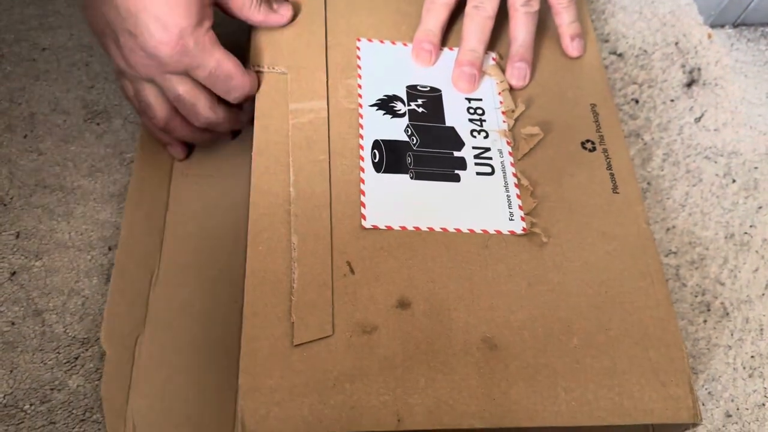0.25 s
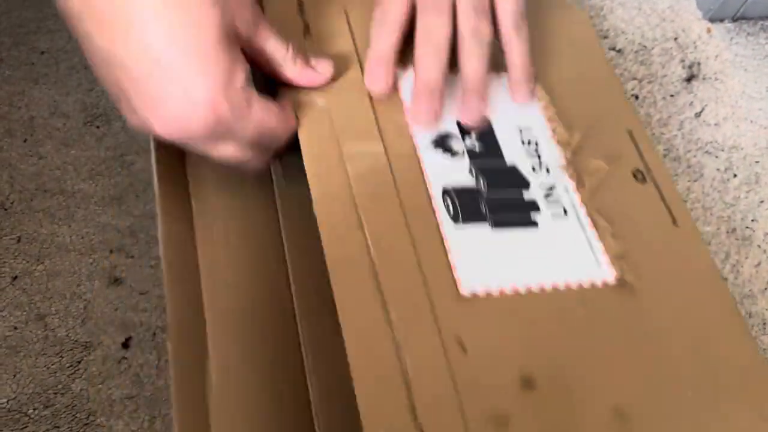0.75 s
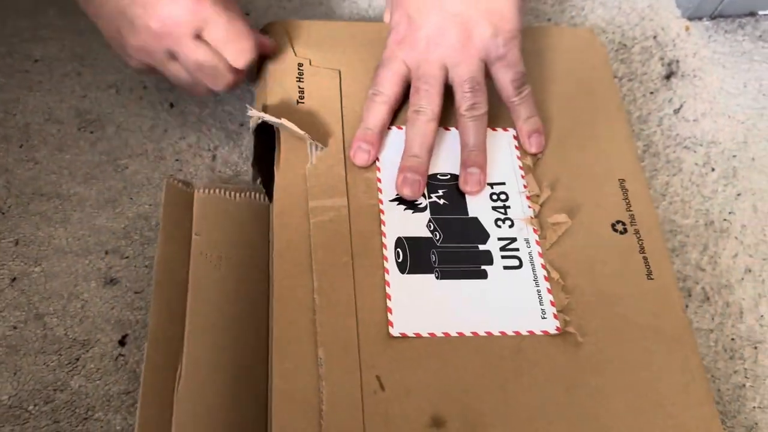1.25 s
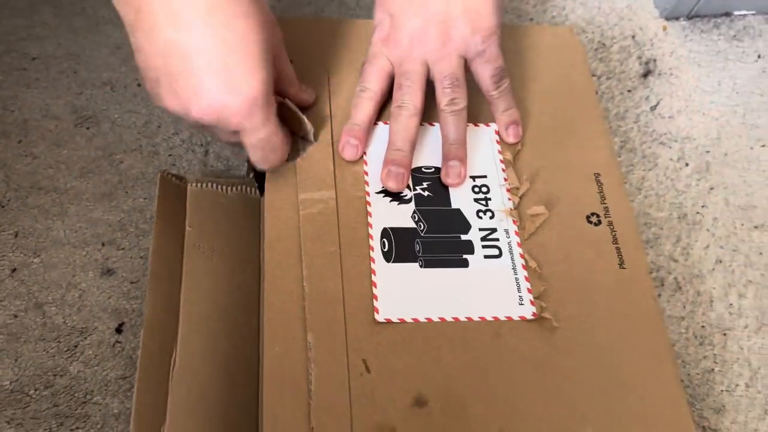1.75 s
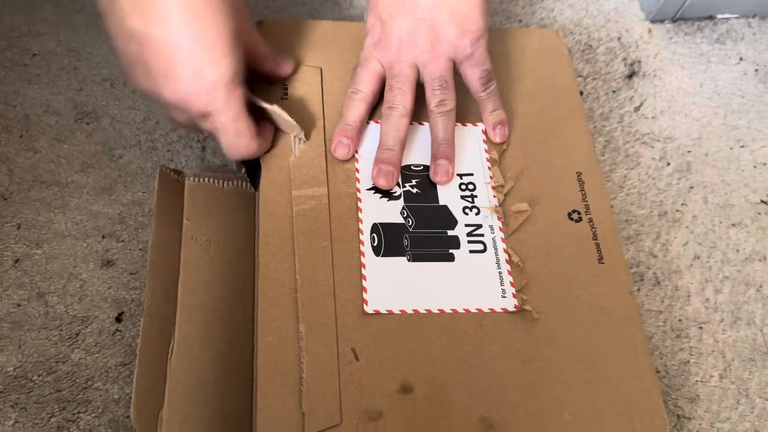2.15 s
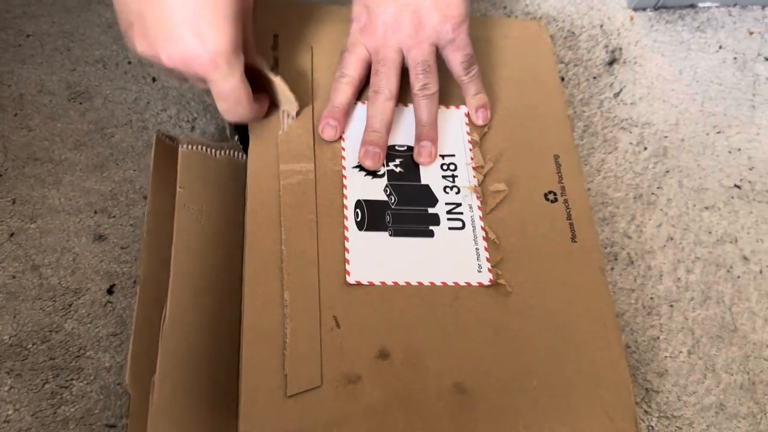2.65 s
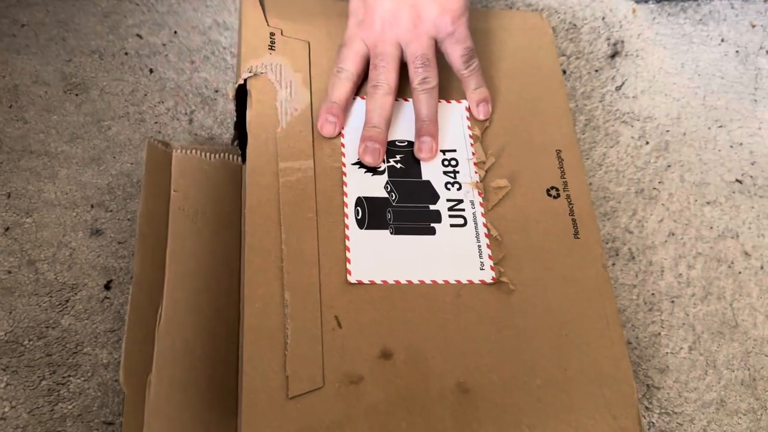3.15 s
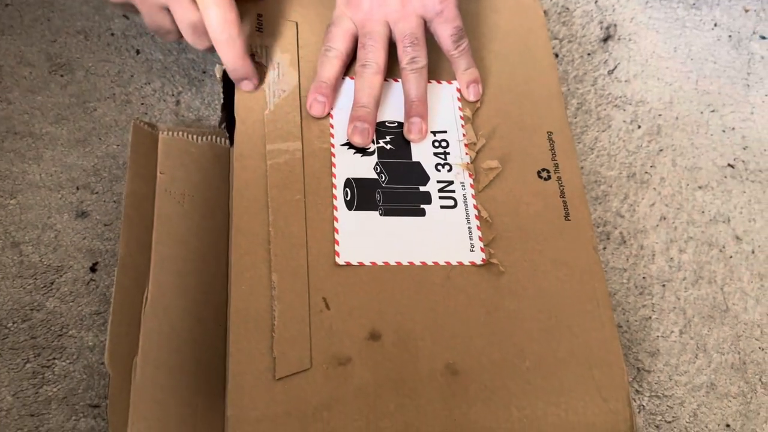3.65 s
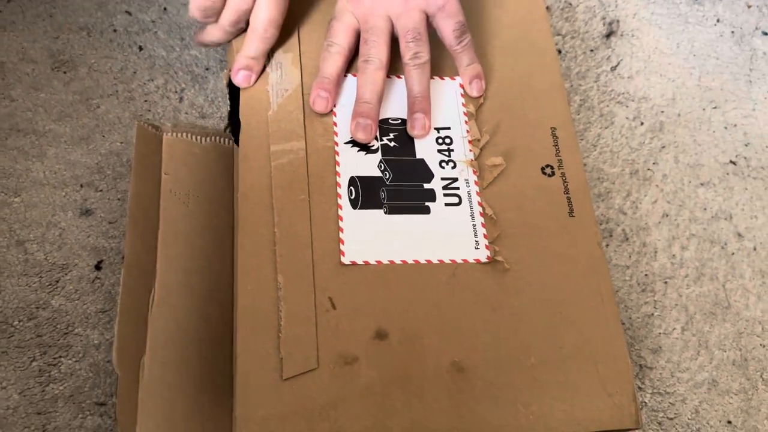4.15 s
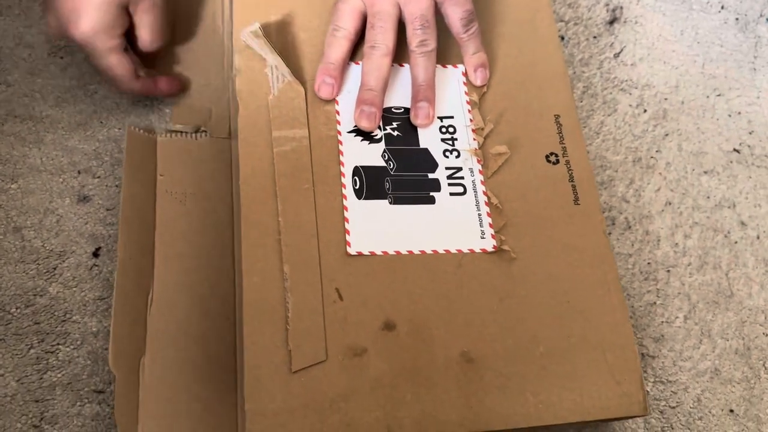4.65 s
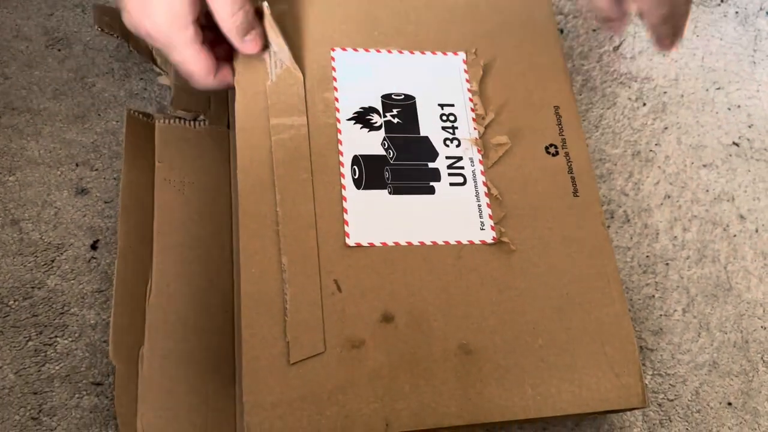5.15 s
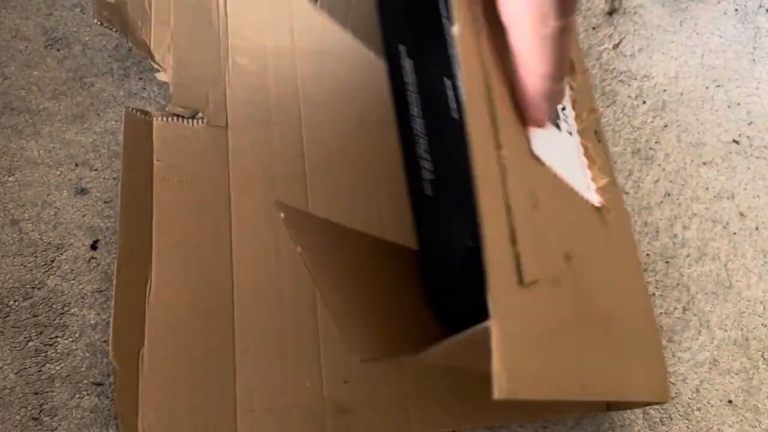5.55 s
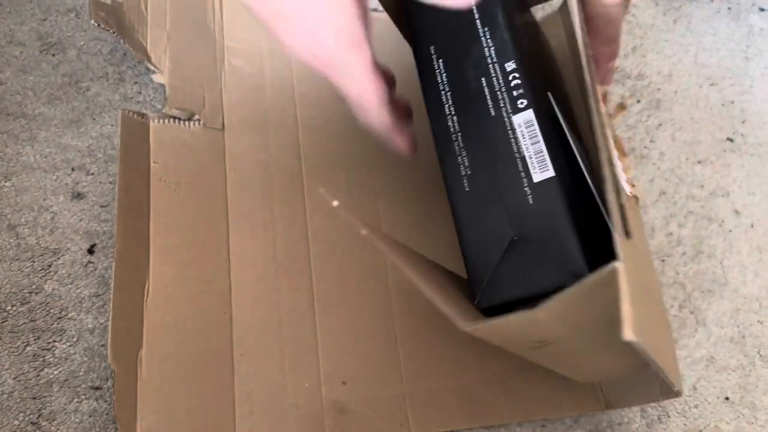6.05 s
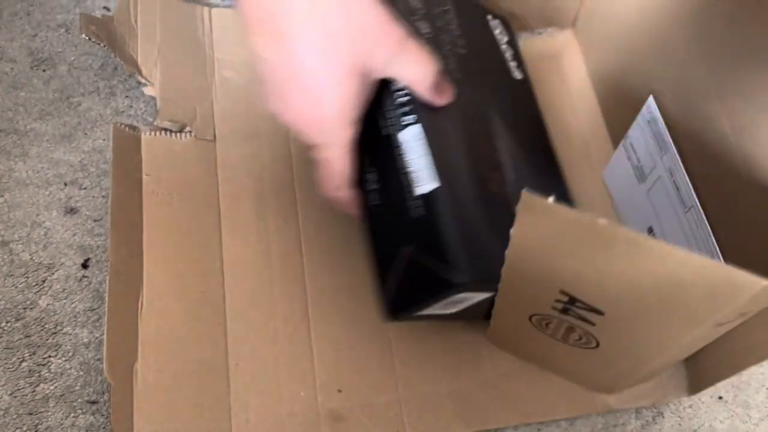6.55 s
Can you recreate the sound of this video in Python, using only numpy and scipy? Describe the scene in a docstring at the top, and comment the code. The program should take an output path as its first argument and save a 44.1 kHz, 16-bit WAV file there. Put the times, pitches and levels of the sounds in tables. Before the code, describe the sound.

Close stereo, indoors, short diffuse tail and faint low rumble. At 0-0.15 s a fast run of perforations pops sharply over fading scrape; fibres crack at 0.3 and 0.5 with a flap knock. Soft thumps and scraping at 0.6-0.85, then a strong crackling snap and knock at 1.1, trailing hiss. From 1.4 to 1.7 a faint fingertip groan and rubs; then mostly quiet rustling and tiny taps, a knock at 2.65. At 2.95-3.07 the strip rips off in a dense burst, ending in a snap. Near quiet, a dull knock at 3.5, swelling scrapes from 3.8, small tears and knocks at 4.1-4.3, a strong knock at 4.58, a softer one at 4.86. Light handling until scraping and heavy flap thuds at 5.6, 5.8 and 5.96, with brief bright edge scrapes. Rubbing from 6.3, a big thud at 6.55, then a hollow carton judders and catches at 6.63-6.8, pitch sagging slightly.

```python
"""Hands work a corrugated cardboard box open on a concrete floor, close to the microphones, indoors.
Board scrapes and hisses as grainy noise; fibres, perforations and flaps snap as short dispersive shocks.
The tear strip rips off in a dense run of breaks, and the panels thump and sway in their low modes.
At the end a smaller carton judders out, stick-slip bursts ringing its hollow walls.
A short diffuse room tail and a faint low rumble lie behind it all, in stereo."""
import sys
import numpy as np
from scipy import signal
from scipy.fft import rfft, irfft, next_fast_len
from scipy.io import wavfile
from scipy.ndimage import uniform_filter1d, map_coordinates

SR = 44100
rng = np.random.default_rng(int(sys.argv[2]) if len(sys.argv) > 2 else 0)


def dump_mix(stems):
    """Bounce the given channels to the path in sys.argv[1] as a 16-bit WAV at rate SR."""
    frames = np.atleast_2d(stems).T  # one column per channel
    limited = np.clip(frames, -1, 1)  # hard clip at full scale
    pcm = np.round(limited * 32767).astype(np.int16)
    wavfile.write(sys.argv[1], SR, pcm)


N = 300321
TIME = np.arange(N) / SR  # s

# Levels are relative to the other sounds of their kind unless stated.
# Strokes over the board, and at 3.22 s a faint swish: [start t/s, end t/s, scrape level/dB,
# hiss against scrape level/dB, swell from start to end level/dB]
STROKES = [(0, 0.15, -43.5, 3, -24.5), (0.58, 0.85, -40, 2.5, 3.5), (0.99, 1.085, -38, 0, 13),
           (1.085, 1.28, -44, 5.5, -28.5), (1.596, 1.68, -42.5, 5, -12), (1.715, 1.84, -40.5, 0, -3.5),
           (2.258, 2.36, -49.5, -17, -9), (2.71, 2.80, -48.5, 6, 30), (3.224, 3.29, -77, 19.5, 21),
           (3.635, 3.785, -48.5, 0.5, -1.5), (3.845, 4.035, -40.5, -7, 19), (4.084, 4.24, -38.5, 0, -6),
           (4.356, 4.47, -41.5, -7, -15.5), (4.53, 4.587, -31.5, 2.5, 20), (4.848, 4.893, -32.5, -0.5, -2),
           (5.245, 5.5, -43.5, 0.5, 10), (5.495, 5.63, -32, 0.5, -1), (5.63, 5.68, -34, -9, 0),
           (6.294, 6.62, -35, -2, -3.5), (6.381, 6.43, -39, 16.5, -1)]
# Hands staying on the box, rustling faintly: [start t/s, end t/s, level/dB]
HANDLING = [(0.152, 0.483, -44), (0.53, 1.317, -46), (1.6, 2.09, -53.5), (2.139, 2.93, -49.5),
            (3.487, 3.6, -49), (4.372, 5.058, -46.5), (5.133, 6.333, -58.5), (5.703, 5.977, -43.5)]
# Single fibres cracking: [t/s, level/dB]
CRACKS = [(0.047, -17), (0.3345, -15.5), (0.4995, -11.5), (1.0825, -4.5), (1.2168, -17), (1.338, -31),
          (1.5988, -19.5), (2.3701, -20), (3.882, -26.5), (4.226, -19.5), (4.443, -19.5), (4.461, -20.5),
          (4.514, -28), (5.314, -20.5), (5.3305, -22), (5.939, -20)]
# Runs of perforations giving way one after another: [first t/s, last t/s, perforations/count,
# level/dB, change over the run level/dB, strip pitch f/Hz]
PERFORATION_RUNS = [(0.063, 0.1034, 5, -3, 3, 840), (0.138, 0.147, 2, -1, 2.5, 900),
                    (1.087, 1.142, 4, -10.5, 14.5, 1000), (4.251, 4.3, 3, -6, -4, 1300)]
# Soft blows on the panels: [t/s, level/dB, pitch f/Hz]
THUMPS = [(0.365, -29, 263), (0.401, -31.5, 297), (0.743, -24, 200), (0.765, -17.5, 240),
          (0.852, -20.5, 93.5), (1.218, -22, 218), (2.553, -27, 400), (2.804, -30, 238),
          (3.037, -14.5, 537), (4.259, -31, 150), (4.359, -33.5, 200), (6.383, -27, 136)]
# A flap strikes the box and sets a panel swaying: [t/s, level/dB, sway against knock level/dB,
# sway pitch f/Hz]
KNOCKS = [(0.499, -5, -25.5, 169), (0.718, -11.5, -22.5, 200), (1.142, -4, -18, 80), (2.658, -15, -48, 250),
          (3.49, -19.5, -28, 300), (3.827, -26.5, -13, 253), (4.084, -15, -21, 230),
          (4.146, -9.5, -25, 180), (4.575, -3, -26.5, 100), (4.864, -17, -5.5, 260),
          (5.587, -2.5, -17, 171), (5.824, 2.5, -15, 121), (5.96, -1, -25.5, 134), (6.556, 3.5, -24.5, 165)]
# Short mid-range knocks: fingertips tapping and catching on the flaps, and the strip snapping free
# at 3.04 s: [t/s, level/dB]
MID_KNOCKS = [(0.847, -18), (2.443, -31), (2.515, -24), (2.543, -24), (3.041, -5.5), (3.839, -20.5),
              (5.219, -30), (6.547, -12)]
# A fingertip dragging twice on the lid: [t/s, level/dB]
FINGERTIP_DRAG = [(1.385, -42), (1.53, -44), (1.595, -79), (1.605, -33.5), (1.66, -45), (1.68, -44)]
# The strip tearing off in one pull: [t/s, fibre level/dB, panel level/dB]
RIP = [(2.945, -46.5, -46.5), (2.97, -25.5, -62.5), (3.002, -18, -24.5), (3.053, -17.5, -15.5),
       (3.068, -36, -44.5), (3.15, -90.5, -64.5)]
# The lid's edge scraping brightly along the glossy carton: [t/s, level/dB]
LID_EDGE = [(5.71, -57), (5.805, -43), (5.818, -20), (5.835, -59.5), (5.907, -28), (5.92, -76.5),
            (5.99, -26)]
# The inner carton being pulled out: [t/s, level/dB]
CARTON_PULL = [(6.629, -17.5), (6.7, -18.5), (6.795, -19.5), (6.812, -27.5)]
# The carton's edge catching hard: [t/s, level/dB]
CARTON_CATCHES = [(6.666, -11), (6.693, -15.5), (6.72, -10.5), (6.729, -13.5)]

# Tone of each contact, as relative density per hertz: [f/Hz, level/dB]
SCRAPE_TONE = [(45, -5), (250, -2.5), (370, -5), (1000, 1), (1500, -4.5), (2900, -10.5), (8000, -36)]
HISS_TONE = [(900, -15.5), (2200, -6), (5600, -1), (11500, -4.5), (15500, -5)]
FIBRE_TONE = [(400, -11.5), (1000, 5.5), (3600, -3), (15500, -7)]
PANEL_TONE = [(60, -22), (450, 2), (950, 4), (3000, -27.5)]
FINGERTIP_TONE = [(80, -22.5), (480, 6), (740, 3), (1000, -11.5), (3000, -31.5)]
# Resonances of the box, heard in every contact: [f/Hz, width f/Hz, level/dB]
BOX_MODES = [(260, 60, -4.5), (486, 76, 0.5), (890, 69, -7.5), (5370, 360, -5)]
# Resonances of the inner carton's walls: [f/Hz, width f/Hz, level/dB]
CARTON_MODES = [(170, 220, -16.5), (515, 170, -9.5), (1102, 180, -2), (1540, 470, -7), (2070, 204, -0.5),
                (2500, 160, -6), (3820, 380, -8), (9100, 2700, -23)]
# Stereo width, side against mid: [f/Hz, level/dB]
STEREO_WIDTH = [(100, -22.5), (1000, -13), (2200, -23), (4300, -3), (6300, -13.5), (10000, -63),
                (13000, -8)]

LID_OPEN_S = 5.6  # from here the flaps also rub on the inner carton
EDGE_HZ, EDGE_WIDTH_HZ = 3950, 630  # resonance of the lid's stiff edge
STRIP_WIDTH_HZ, STRIP_DB = 170, 4.5  # ring of the taut strip
# fibres dragging through a run: level against its pops, hiss against scrape, overhang at each end
TEAR_RUB_DB, TEAR_HISS_DB, TEAR_MARGIN_S = -27, 0.5, 0.012
# a struck flap skidding on: length, level against the knock, hiss against scrape
SKID_S, SKID_DB, SKID_HISS_DB = 0.024, -27.5, -18
SWAY_S = 0.004  # from a knock to its sway
TEAR_T60_S, CRACK_T60_S, KNOCK_T60_S = 0.02, 0.016, 0.027  # ring of each snap at 1 kHz
CARTON_SAG_PER_S = 0.28  # share of the carton's pitch lost per second as it comes free
TOP_HZ = 16050  # band limit of the microphones


def amp(db):
    """Decibels to gain."""
    return 10 ** (np.asarray(db) / 20)


def unit(x):
    """Scaled to rms 1."""
    return x / np.sqrt(np.mean(x ** 2) + 1e-20)


def along(points, hz):
    """Points of (Hz, value) read on a log frequency axis."""
    f, values = np.transpose(points)
    return np.interp(np.log(hz + 1), np.log(f), values)


def gains(rows):
    """One smoothed gain curve for each dB column, near silent outside the rows."""
    s, *columns = np.transpose(rows)
    curves = [amp(np.interp(TIME, s, db, left=-120, right=-120)) for db in columns]
    return [uniform_filter1d(curve, size=200) for curve in curves]


def wobble(rate):
    """A smooth random curve with this many knots a second."""
    knots = rng.standard_normal(int(N * rate / SR) + 4)
    return map_coordinates(knots, [TIME * rate])


def filtered(x, response):
    """Sound multiplied by a response of frequency."""
    n = x.shape[-1]
    size = next_fast_len(n + 8192)
    spectrum = rfft(x, size) * response(np.fft.rfftfreq(size, 1 / SR))
    return irfft(spectrum, size)[..., :n]


def resonance(f, hz, width):
    """Response of one damped mode, 1 at its centre."""
    return 1j * f * width / (hz * hz - f * f + 1j * f * width)


def coloured(x, tone, size=4096):
    """Sound rung through a minimum-phase filter of this tone, at rms 1."""
    cepstrum = irfft(np.log(amp(along(tone, np.fft.rfftfreq(size, 1 / SR)))))
    # folding the cepstrum onto positive times makes the filter causal
    fold = np.r_[.5, np.ones(size // 2 - 1)]
    response = irfft(np.exp(rfft(2 * cepstrum[:size // 2] * fold, size)))
    return unit(signal.fftconvolve(x, response)[:N])


def grains(rate, scatter_db, smooth):
    """Fibres catching and letting go: ticks of uneven size over a smooth rush."""
    sizes = amp(scatter_db * np.clip(rng.standard_normal(N), -2, 2))
    ticks = (rng.random(N) < rate / SR) * rng.choice([-1, 1], N) * sizes
    return unit(unit(ticks) + smooth * rng.standard_normal(N))


def slips(rate, jitter, scatter_db, t60):
    """Stick and slip: short decaying noise bursts at an uneven rate."""
    cycles = np.cumsum(rate * np.exp(jitter * wobble(rate))) / SR
    releases = np.diff(np.floor(cycles), prepend=0) * amp(scatter_db * rng.standard_normal(N))
    envelope = signal.lfilter([1], [1, -amp(-60 / (t60 * SR))], releases)
    return envelope * rng.standard_normal(N)


def shifting(x, depth_db, size=512):
    """As the contact moves, ever different parts of the board speak: the tone drifts at random."""
    z = signal.stft(x, nperseg=size)[2]
    field = uniform_filter1d(rng.standard_normal(z.shape), size=5, axis=0)  # over frequency
    field = uniform_filter1d(field, size=10, axis=1)  # over time
    moved = z * amp(depth_db * unit(field))
    return unit(signal.istft(moved, nperseg=size)[1][:N])


def add(track, s, sound):
    """Mix a sound into the track at s seconds."""
    part = track[max(round(s * SR), 0):][:len(sound)]
    part += sound[:len(part)]


def blow(spectrum, t60, slope, lag, direct_db, count=10, size=8192):
    """One shock through the board: a falling wave, then its echoes off the edges.
    The spectrum is in dB per octave; t60 and lag are seconds at 1 kHz."""
    centres = np.geomspace(40, 16000, count)[:, None]

    def band_shape(hz):
        octaves = np.log2((hz + 1) / centres)
        return np.cos(np.pi / 2 * np.clip(octaves, -1, 1))

    def direct_response(hz):
        travel = np.exp(-4j * np.pi * lag * np.sqrt(1000 * hz))
        return amp(along(spectrum, hz)) * travel / np.sqrt(hz + centres[0])

    bands = filtered(rng.standard_normal(size), band_shape)
    slowness = 1000 / centres
    # bending waves are dispersive: the bass arrives later and rings longer
    age = np.maximum(np.arange(size) / SR - lag * np.sqrt(slowness), 0)
    life = t60 * (1 + slowness ** slope) / 2
    bands = bands * amp(-60 * age / life) * (1 - np.exp(-25 * age / life))
    bands = bands / np.linalg.norm(bands, axis=1, keepdims=True)
    echoes = np.sum(bands * amp(along(spectrum, centres)), axis=0)
    wave = unit(filtered(signal.unit_impulse(size), direct_response))
    return (echoes + amp(direct_db) * echoes.std() * wave) / np.hypot(1, amp(direct_db))


def snaps(events, t60, level_db, panel_db, board_db, fibre_db):
    """Each snap is a crack of fibres and a short knock of the panel in one shock."""
    track = np.zeros(N)
    spectrum = [(40, panel_db - 14), (110, panel_db + 11.0), (280, panel_db), (900, board_db),
                (2400, -14.5), (5000, fibre_db + 0.5), (13000, fibre_db)]
    for s, db, *_ in events:
        shock = blow(spectrum, t60=t60, slope=0.25, lag=0.001172, direct_db=-3.5)
        add(track, s, amp(db + level_db) * shock)
    return track


def rubbing_power(strokes, bite=0.0052, release=0.018):
    """Power of scrape and hiss: each stroke bites quickly, swells or fades, and lets go more slowly."""
    scrape, hiss = np.zeros((2, N))
    for start, end, db, hiss_db, swell_db in strokes:
        contact = (1 + np.tanh((TIME - start) / bite)) / 2 * (1 + np.tanh((end - TIME) / release)) / 2
        progress = np.clip((TIME - start) / (end - start), 0, 1)
        speed = contact * amp(db + swell_db * (progress - .5))
        scrape += speed ** 2
        hiss += (speed * amp(hiss_db)) ** 2
    return np.array([scrape, hiss])


def contacts():
    """Powers of all that rubs: strokes, fibres dragging in a tear, flaps skidding, hands fidgeting."""
    drags = [(first - TEAR_MARGIN_S, last + TEAR_MARGIN_S, db + TEAR_RUB_DB, TEAR_HISS_DB, 0)
             for first, last, _, db, *_ in PERFORATION_RUNS]
    skids = [(s, s + SKID_S, db + SKID_DB, SKID_HISS_DB, 0) for s, db, *_ in KNOCKS]
    hands = [(start, end, db, 0, 0) for start, end, db in HANDLING]
    return rubbing_power(STROKES + drags + skids) + rubbing_power(hands, bite=0.0044, release=0.047)


def sliding():
    """Wherever board is rubbed, the panel sounds the coarse catches and the surface hisses."""
    scrape, hiss = contacts()
    grip = amp(2.0 * wobble(35) + 1.79 * wobble(160))
    catches = grains(600, scatter_db=4.0, smooth=1.0)
    inner = (TIME > LID_OPEN_S) * unit(walls(rng.permutation(catches)))
    coarse = shifting(coloured(catches, SCRAPE_TONE) + amp(-2.5) * inner, depth_db=2.5)
    rush = grains(2000, scatter_db=3.5, smooth=0.96)
    fine = shifting(coloured(rush, HISS_TONE), depth_db=3.5)
    # now and then a single fibre lets go with a tick
    ticks = amp(-9.5) * coloured(slips(24, jitter=.7, scatter_db=4, t60=0.008), FIBRE_TONE)
    plucking = np.sqrt(hiss) + amp(-9) * gains(FINGERTIP_DRAG)[0]
    board = np.sqrt(scrape) * coarse + np.sqrt(hiss) * fine + plucking * ticks
    return grip * (board + lid_edge(catches))


def fibre_cracks():
    """Single fibres break with bright, short snaps."""
    return snaps(CRACKS, CRACK_T60_S, level_db=13.0, panel_db=-45.5, board_db=-10.5, fibre_db=-6.5)


def perforations():
    """Perforations, evenly spaced in time, pop in turn and ring the taut strip."""
    track = np.zeros(N)
    for first, last, number, db, change_db, hz in PERFORATION_RUNS:
        run = []
        for u in np.linspace(0, 1, round(number)):
            # each perforation is a little stronger or weaker
            level = db + change_db * (u - .5) + rng.standard_normal()
            run.append((first + u * (last - first), level))
        pops = snaps(run, TEAR_T60_S, level_db=12.0, panel_db=-31.0, board_db=-7.5, fibre_db=-10.0)
        track += filtered(pops, lambda f: 1 + amp(STRIP_DB) * resonance(f, hz, STRIP_WIDTH_HZ))
    return track


def thumps():
    """Soft contacts, and the sway after each knock, move mainly the low modes of the panels."""
    track = np.zeros(N)
    sways = [(s + SWAY_S, db + sway_db, hz) for s, db, sway_db, hz in KNOCKS]
    for s, db, hz in THUMPS + sways:
        spectrum = [(hz / 8, -36), (hz / 4, -20), (hz, 0), (hz * 1.47, -7), (hz * 10, -32)]
        shock = blow(spectrum, t60=0.032, slope=1.0, lag=0.00401, direct_db=4.5)
        add(track, s, amp(db + 23.0) * shock)
    return track


def flap_knocks():
    """Flaps strike the box with dull shocks, weak in the treble."""
    return snaps(KNOCKS, KNOCK_T60_S, level_db=15.0, panel_db=-28.5, board_db=-7.5, fibre_db=-23.0)


def mid_knocks():
    """Fingertips on the flaps, and the strip snapping free, give short shocks strongest in the mid-range."""
    return snaps(MID_KNOCKS, KNOCK_T60_S, level_db=9.5, panel_db=-13.5, board_db=3.0, fibre_db=-20)


def fingertip_groan():
    """A dull groan as the fingertip sticks and slips over the lid."""
    stutter = slips(260, jitter=0.14, scatter_db=0.0, t60=0.027)
    return gains(FINGERTIP_DRAG)[0] * coloured(stutter, FINGERTIP_TONE)


def rip():
    """Fibres break in a dense run; the panel joins in as the strip comes free."""
    fibre, panel = gains(RIP)
    breaks = grains(1500, scatter_db=-1.5, smooth=1.0) * amp(2.1 * wobble(200))
    return fibre * coloured(breaks, FIBRE_TONE) + panel * coloured(breaks, PANEL_TONE)


def lid_edge(catches):
    """The same catches in shuffled order ring the stiff edge of the lid on the glossy carton."""
    def response(f):
        return resonance(f, EDGE_HZ, EDGE_WIDTH_HZ) + resonance(f, EDGE_HZ, EDGE_HZ) / 2

    return gains(LID_EDGE)[0] * unit(filtered(rng.permutation(catches), response))


def walls(x):
    """The hollow inner carton rings; as it flexes, each mode wanders in pitch and strength on its own."""
    rung = np.zeros(N)
    for k, (hz, width, db) in enumerate(CARTON_MODES):
        ring = filtered(x, lambda f: (-1) ** k * resonance(f, hz, width))
        flexed = map_coordinates(ring, [(TIME + 0.0006 * wobble(30)) * SR], mode="nearest")
        rung += amp(db + 1.5 * wobble(70)) * flexed
    power = sum(np.pi * width * amp(db) ** 2 for _, width, db in CARTON_MODES) / SR
    return rung / np.sqrt(power)


def carton():
    """The carton's edge judders across the board, catches hard a few times, and rings its walls."""
    judder = slips(108, jitter=.15, scatter_db=1, t60=.02)
    rubbing = gains(CARTON_PULL)[0] * unit(unit(judder) + 0.45 * rng.standard_normal(N))
    t = np.arange(SR // 20) / SR
    for s, db in CARTON_CATCHES:
        add(rubbing, s, amp(db - 60 * t / KNOCK_T60_S) * rng.standard_normal(len(t)))
    # reading the sound ever more slowly makes the pitch sink
    elapsed = np.clip(TIME - CARTON_PULL[0][0], 0, None)
    read_at = TIME - CARTON_SAG_PER_S * elapsed ** 2 / 2
    return map_coordinates(walls(rubbing), [read_at * SR], mode="nearest")


def body(x):
    """Panels and the air between them ring with every contact; the treble has a hollow."""
    def response(f):
        modes = sum(amp(db) * resonance(f, hz, width) for hz, width, db in BOX_MODES)
        return (1 + modes) * (1 - amp(-7.5) * resonance(f, 4650, 1100))

    return filtered(x, response)


def room(x, t60=0.17):
    """A short diffuse tail of decaying noise, arriving 200 samples late."""
    t = np.arange(SR // 2) / SR
    tail = rng.standard_normal(len(t)) * amp(-60 * t / t60)
    return signal.fftconvolve(np.pad(x, (200, 0)), tail / np.linalg.norm(tail))[:N]


def spread(x):
    """Each catch comes from another spot, so its phase differs a little between the two microphones."""
    side = filtered(x * unit(wobble(260)), lambda hz: 1j * amp(along(STEREO_WIDTH, hz)))
    return np.array([x + side, x - side])


def scene():
    """The box close by in a quiet room with a faint low rumble."""
    rubbed = sliding() + fingertip_groan() + rip() + carton()
    struck = fibre_cracks() + perforations() + thumps() + flap_knocks() + mid_knocks()
    box = body(rubbed + struck)
    rumble = amp(-59.0) * coloured(rng.standard_normal(N), [(30, -16), (70, -1.5), (5000, -46.5)])
    return spread(box + amp(-14.0) * room(box) + rumble)


def record(dry, low_cut_hz=42):
    """The microphones drop the deepest bass and round off peaks, then a steep band limit cuts the top."""
    low_cut = signal.butter(4, low_cut_hz, "highpass", fs=SR, output="sos")
    heard = signal.sosfilt(low_cut, dry)
    rounded = heard / (1 + np.abs(heard / .9) ** 4) ** (1 / 4)
    return filtered(rounded, lambda hz: 1 / np.sqrt(1 + (hz / TOP_HZ) ** 240))


dry = scene()
out = record(dry)
dump_mix(out)
```